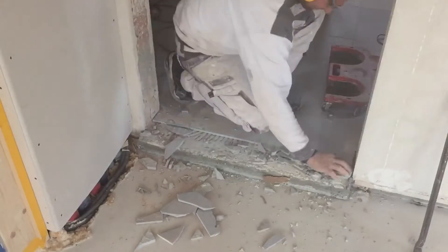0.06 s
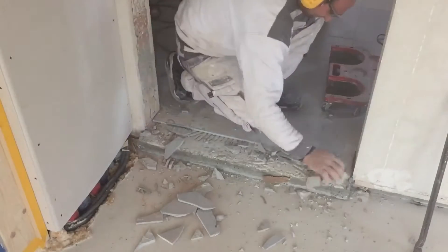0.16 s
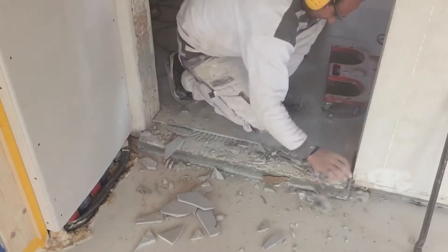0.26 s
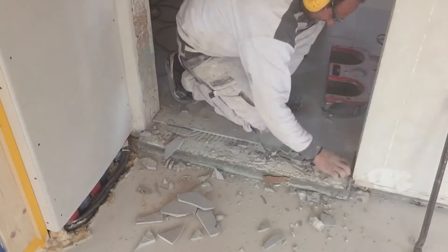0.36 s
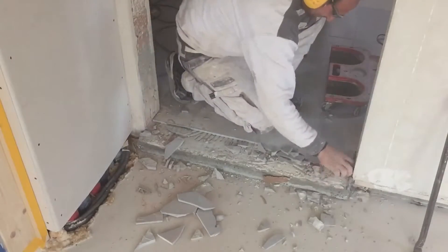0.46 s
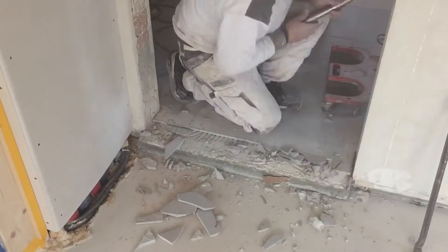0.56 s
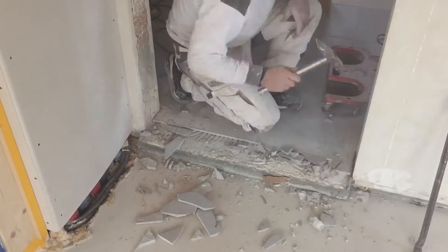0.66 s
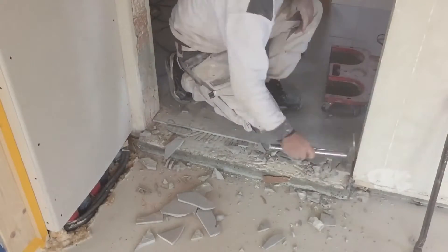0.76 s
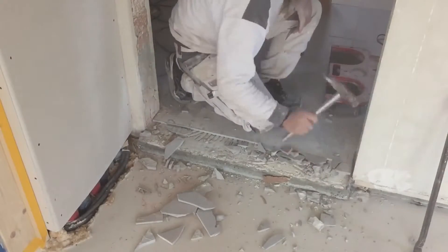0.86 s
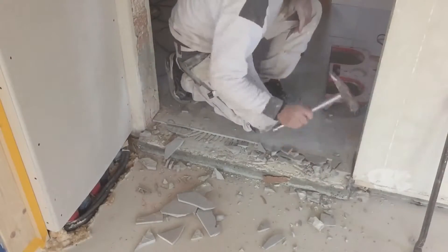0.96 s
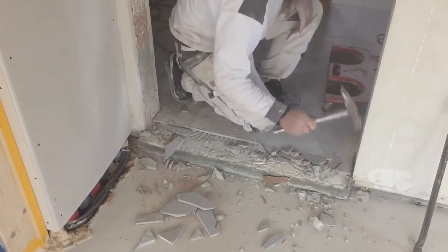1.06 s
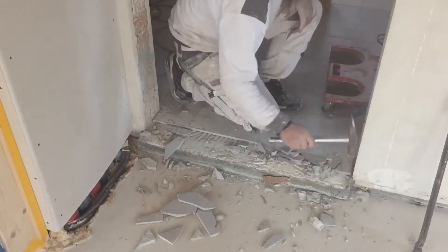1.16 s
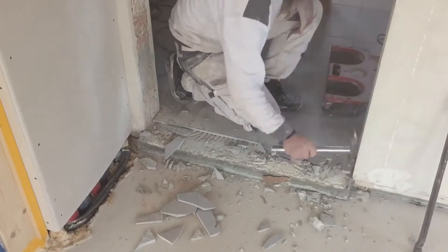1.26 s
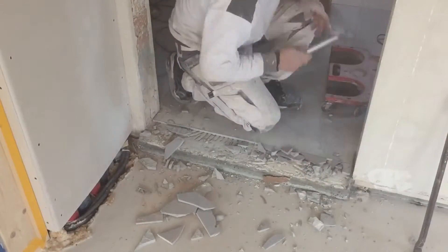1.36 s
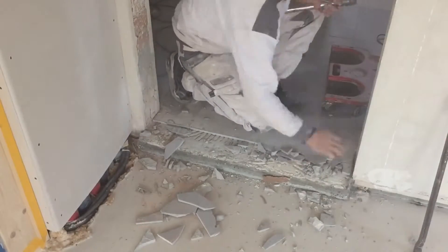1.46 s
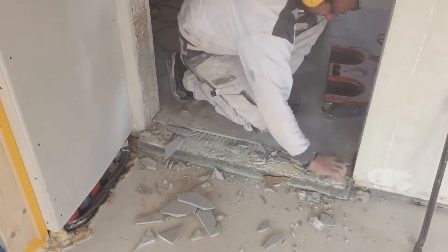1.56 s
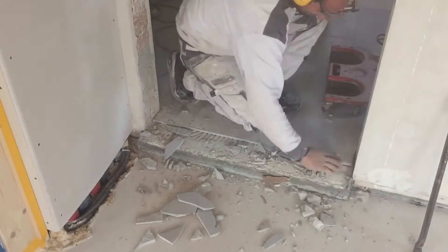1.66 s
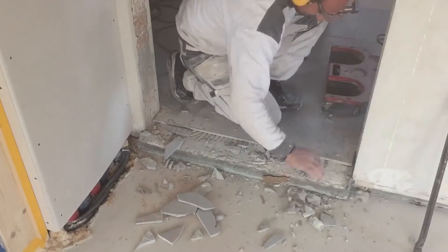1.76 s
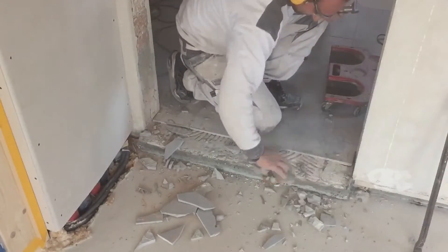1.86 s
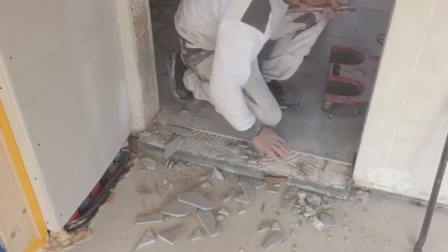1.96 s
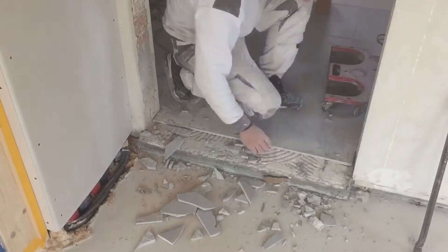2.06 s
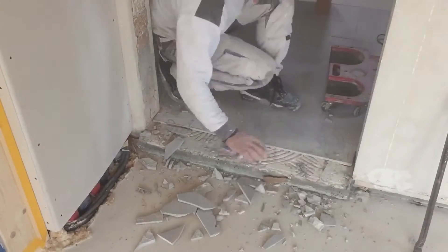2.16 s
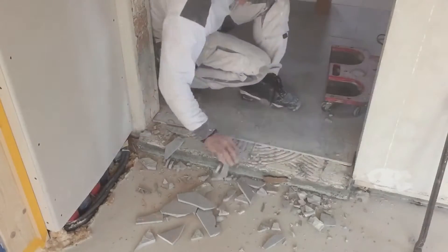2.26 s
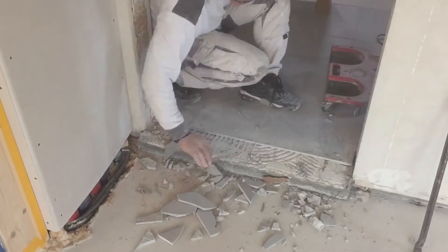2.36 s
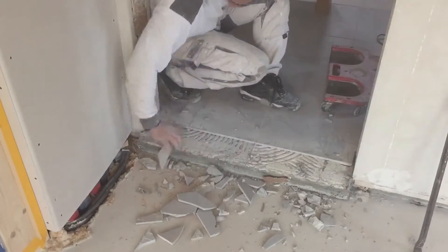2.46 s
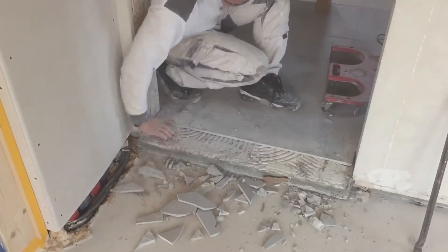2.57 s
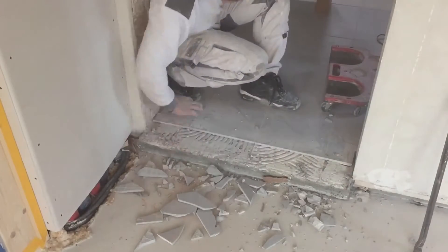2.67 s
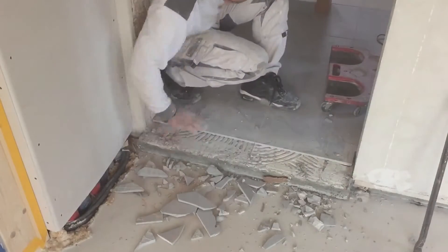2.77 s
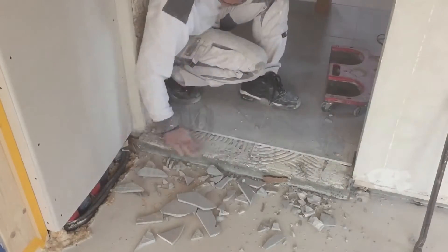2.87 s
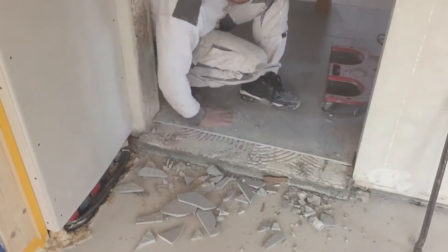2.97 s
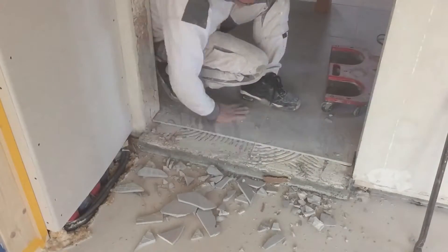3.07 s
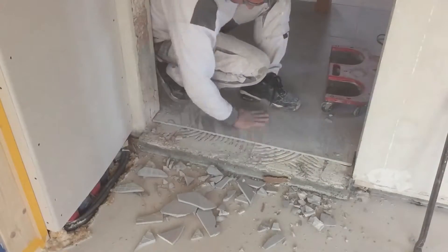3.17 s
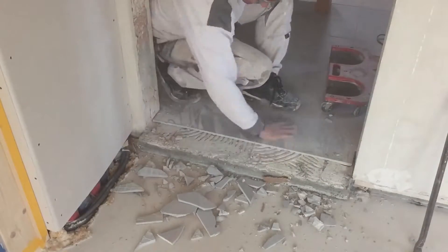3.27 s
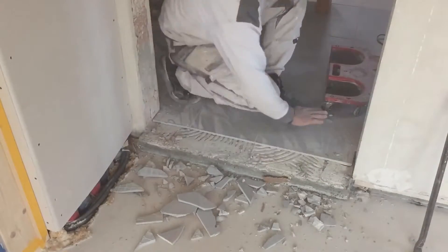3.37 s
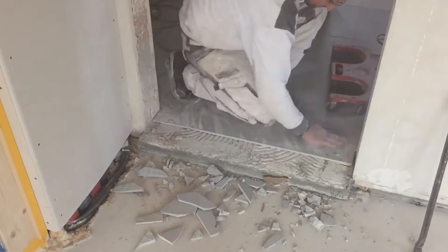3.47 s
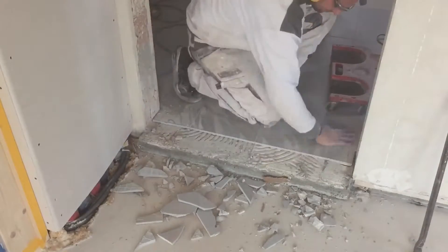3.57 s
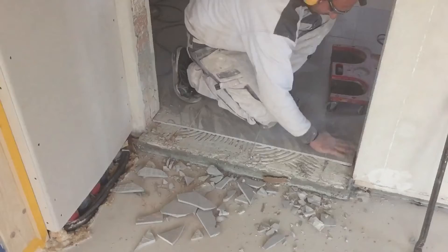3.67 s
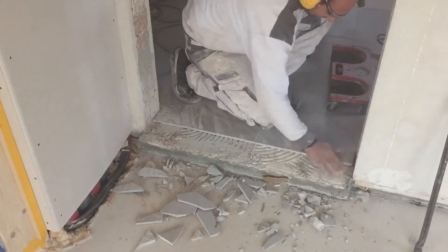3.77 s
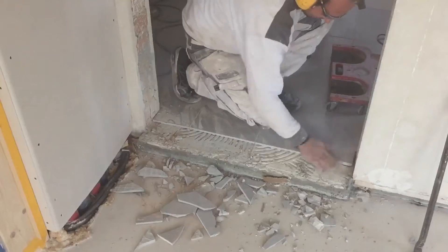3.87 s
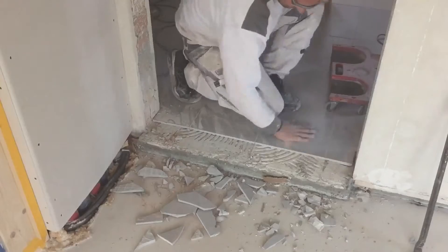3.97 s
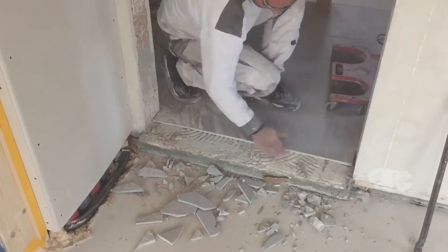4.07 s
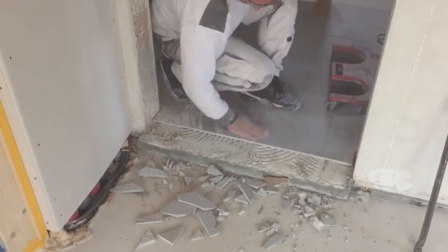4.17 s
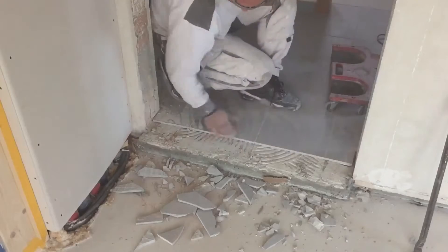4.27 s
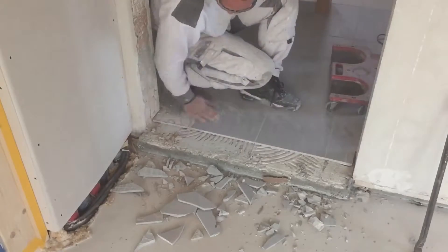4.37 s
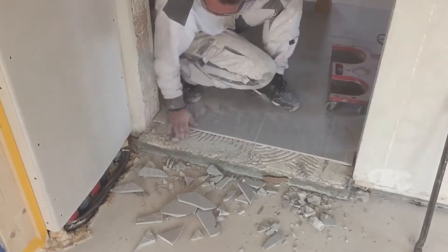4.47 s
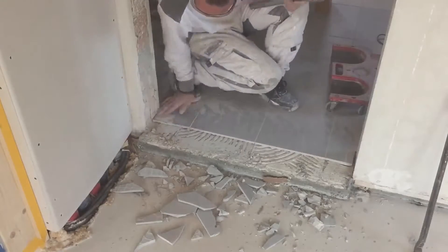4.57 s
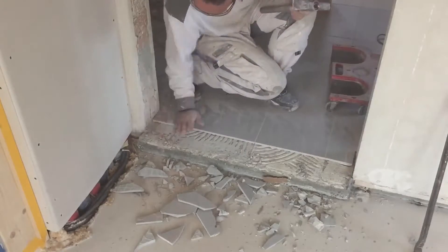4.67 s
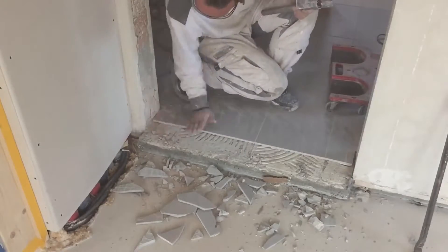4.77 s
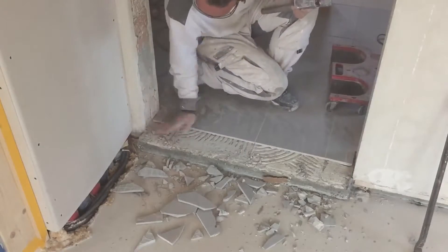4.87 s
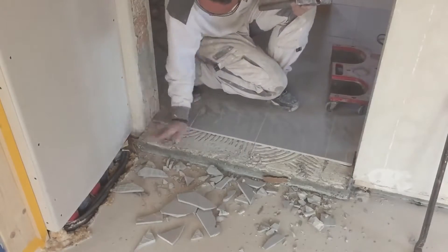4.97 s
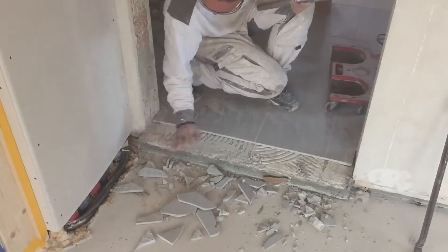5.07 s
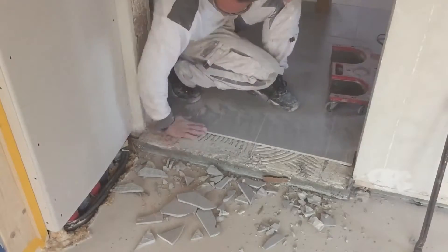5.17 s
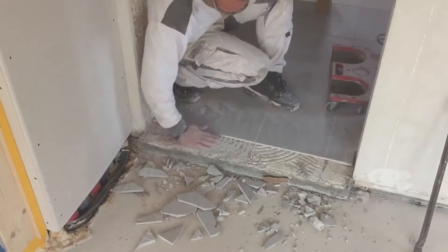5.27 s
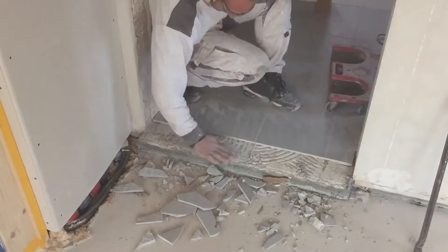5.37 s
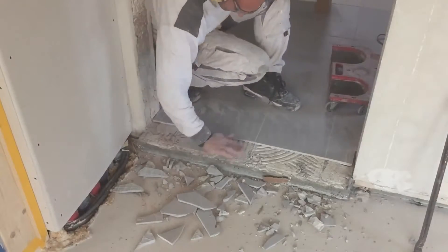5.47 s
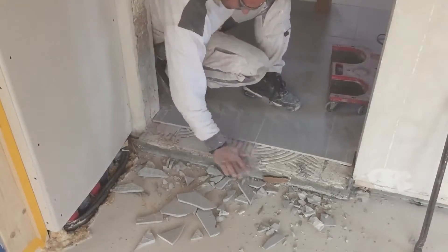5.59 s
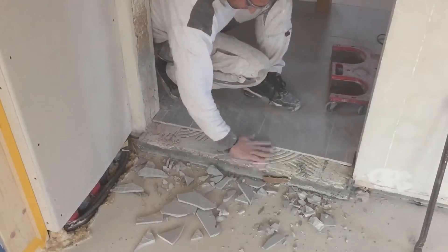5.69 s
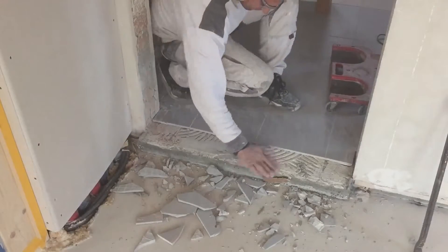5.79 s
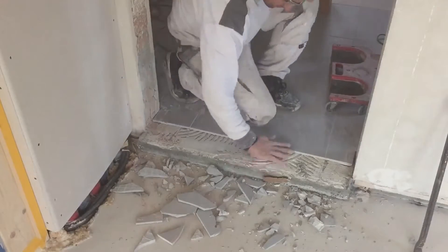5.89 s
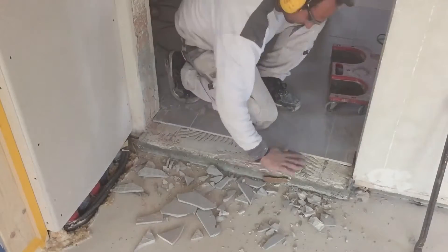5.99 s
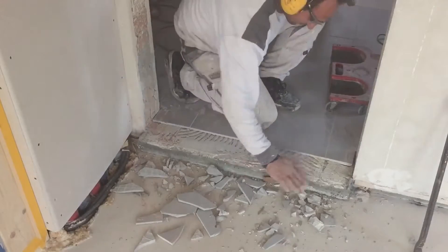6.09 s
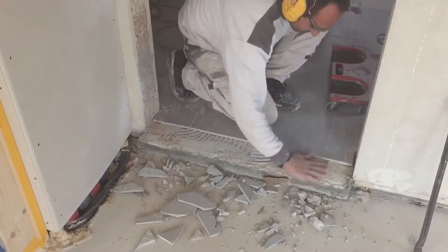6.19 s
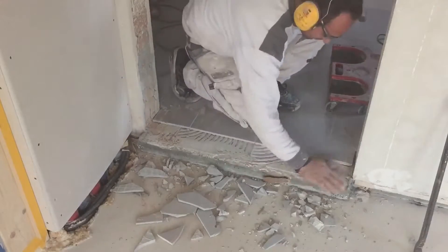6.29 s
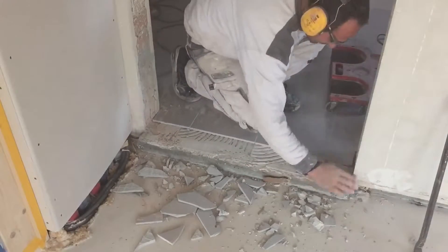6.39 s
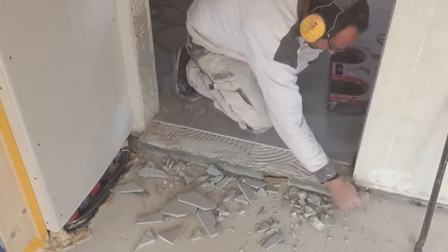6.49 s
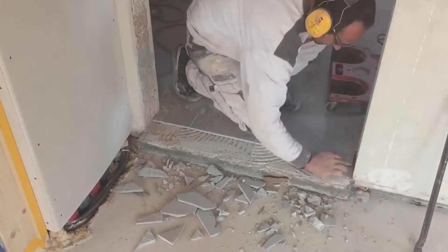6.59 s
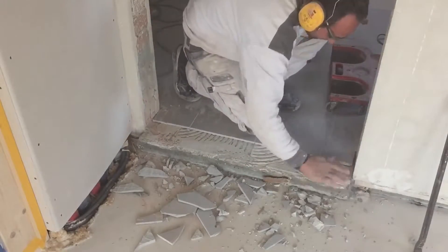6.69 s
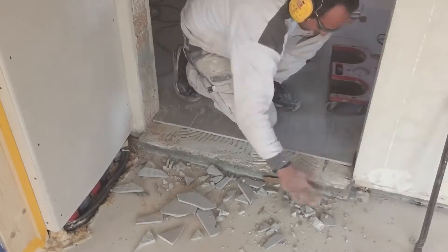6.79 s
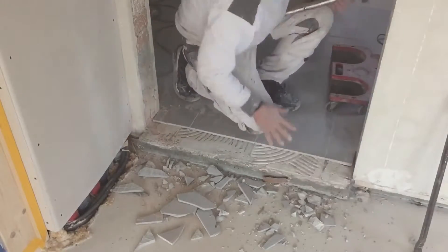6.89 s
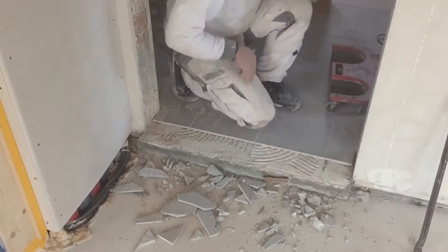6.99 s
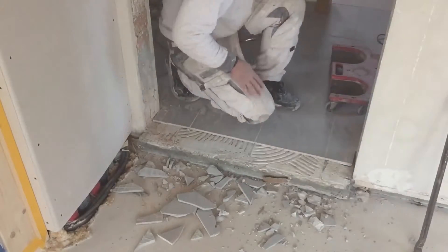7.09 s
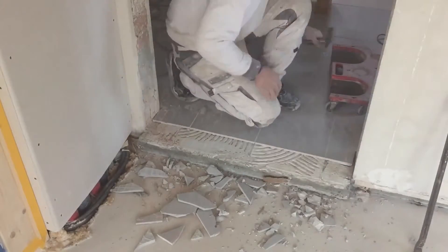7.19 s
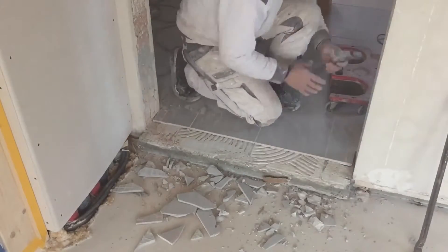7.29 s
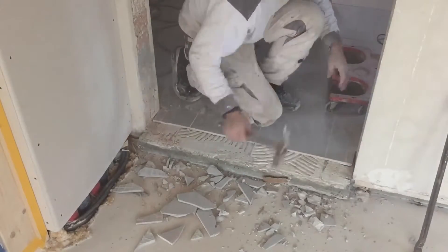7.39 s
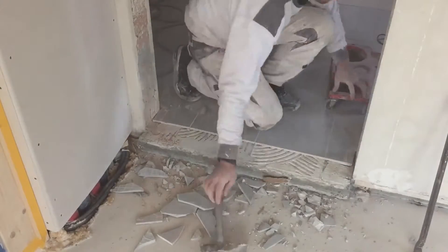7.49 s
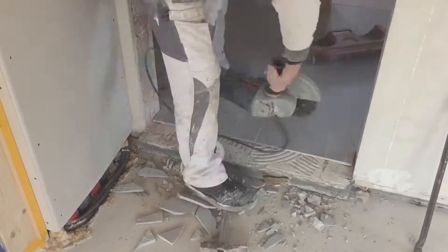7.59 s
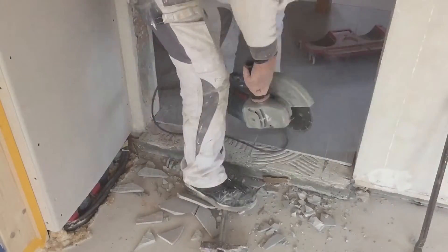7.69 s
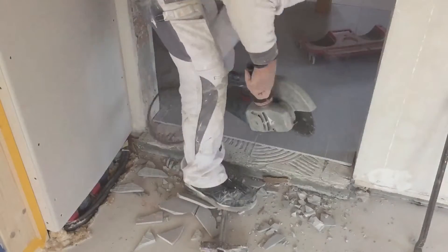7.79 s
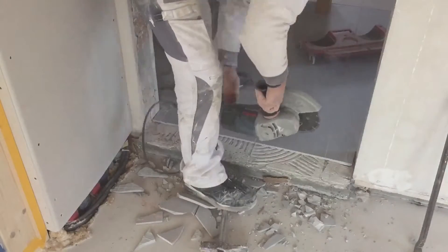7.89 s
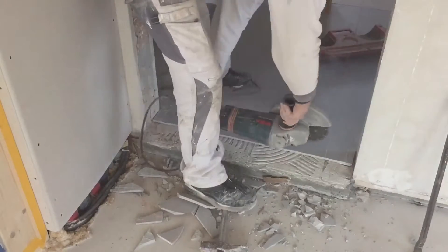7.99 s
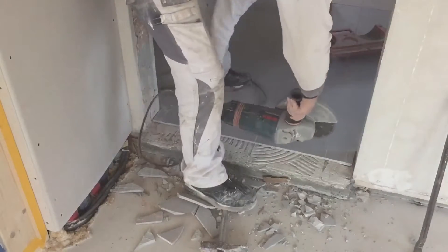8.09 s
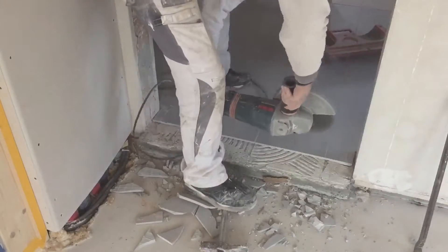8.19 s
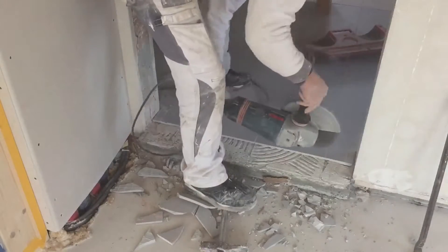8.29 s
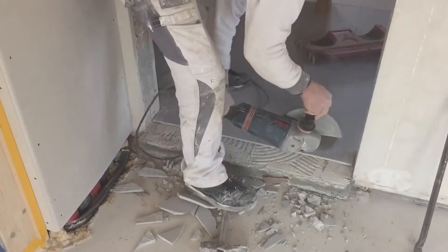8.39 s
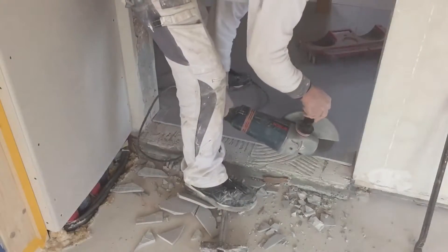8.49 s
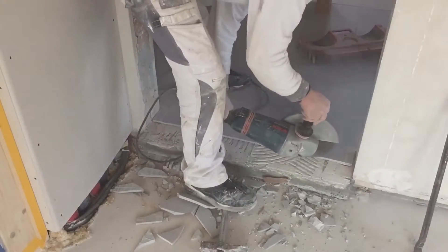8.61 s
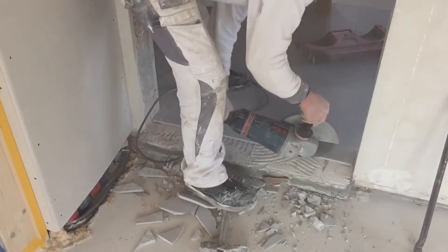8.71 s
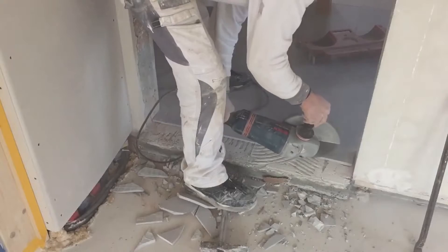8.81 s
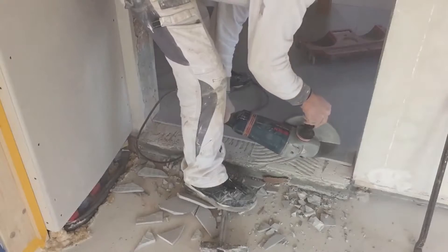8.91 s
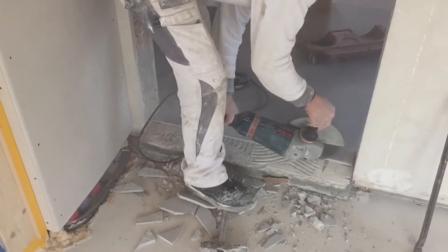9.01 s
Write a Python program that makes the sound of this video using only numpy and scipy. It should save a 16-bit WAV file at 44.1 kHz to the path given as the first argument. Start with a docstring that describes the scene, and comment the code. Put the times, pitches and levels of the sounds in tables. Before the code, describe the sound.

Dry scraping of tile shards and grit, quick hammer knocks, a ringing chisel drop, and finally a large grinder starting and biting screed.

```python
"""In a bare room a hand sweeps rubble and grit off a combed tile bed: noise grains swell and die in strokes.
A hammer lands five blows, each a crack and a short ring. Sweeping goes on, with palm slides over the ridges.
A steel chisel clatters down, in clanks and beating modes. Last, a large angle grinder starts: its disc
rattles and rings as resonated grains, the motor whines up, and the disc screeches on the screed.
Throughout, a far machine drones through the building as coloured noise with wavering, humming bands."""
import sys
import numpy as np
from scipy import signal
from scipy.fft import rfft, irfft, next_fast_len
from scipy.io import wavfile
from scipy.ndimage import uniform_filter1d

SR = 44100
rng = np.random.default_rng(int(sys.argv[2]) if len(sys.argv) > 2 else 0)


def transcribe(signal):
    """Save signal, clipped to [-1, 1], as a 16-bit WAV file at the path in sys.argv[1]."""
    frames = np.atleast_2d(signal).T
    limited = np.clip(frames, -1, 1)
    pcm = np.round(limited * 32767).astype(np.int16)
    wavfile.write(sys.argv[1], SR, pcm)


N = 399105  # samples


def gain_of(db):
    """Turns decibels into an amplitude factor."""
    return 10 ** (np.asarray(db) / 20)


def evened(x):
    """Scales to rms 1."""
    return x / np.sqrt(np.mean(x ** 2) + 1e-20)


def read(points, hz):
    """Reads a curve on a log-frequency axis."""
    f, value = np.transpose(points)
    return np.interp(np.log(hz + 1), np.log(f + 1), value)


def level_at(points, t):
    """Reads a curve of (seconds, value) at the times t."""
    return np.interp(t, *np.transpose(points))


def add(mix, s, sound):
    """Mixes a sound in at s seconds."""
    part = mix[round(s * SR):][:len(sound)]
    part += sound[:len(part)]


def filtered(x, points, size):
    """Applies a curve of dB over Hz by FFT."""
    hz = np.fft.rfftfreq(size, 1 / SR)
    return irfft(rfft(x, size) * gain_of(read(points, hz)), size)


def coloured(x, points):
    """Filters by a spectrum and scales to rms 1."""
    return evened(filtered(x, points, next_fast_len(len(x)))[:len(x)])


def resonate(x, hz, width):
    """One resonance: shifts hz down to zero, smooths, shifts back; rms 1."""
    turn = np.exp(2j * np.pi * np.cumsum(hz * np.ones(len(x))) / SR)
    r = np.exp(-np.pi * abs(width) / SR)
    return evened((turn * signal.lfilter([1], [1, -r], x / turn)).real)


def resonate_twice(x, hz, width):
    """Two equal resonances in a row, for steeper skirts."""
    return resonate(resonate(x, hz, width), hz, width)


def wander(count, smooth):
    """Slow random motion: noise averaged twice over smooth samples; rms 1."""
    noise = rng.standard_normal(count)
    return evened(uniform_filter1d(uniform_filter1d(noise, smooth), smooth))


def grains(count, per_s, spread_db):
    """Sparse clicks of random sign, a few large."""
    sizes = gain_of(spread_db * np.minimum(rng.exponential(1, count), 5))
    return evened(rng.standard_normal(count) * sizes * (rng.random(count) < per_s / SR))


def ringing(modes, t, uneven_db, upper_db=0.):
    """Dying sines, struck unevenly; upper_db lifts the modes above 8 kHz."""
    out = np.zeros(len(t))
    for (hz, db, t60), struck in zip(modes, rng.standard_normal(len(modes))):
        start_db = db + uneven_db * struck + upper_db * (hz > 8000)
        out += gain_of(start_db - 60 * t / t60) * np.sin(2 * np.pi * hz * t)
    return out


def click(points):
    """The sharpest causal (minimum-phase) pulse with a given spectrum, energy 1."""
    log_gain = np.log(gain_of(read(points, abs(np.fft.fftfreq(4096, 1 / SR)))))
    pulse = np.fft.ifft(np.exp(np.conj(signal.hilbert(log_gain)))).real[:2048]
    return pulse / np.linalg.norm(pulse)


def splinters(points, t, decay_s, share):
    """One sharp pulse followed by a short spray of smaller ones."""
    spray = share * rng.standard_normal(len(t)) * np.exp(-t / decay_s) + (t == 0)
    return signal.fftconvolve(spray, click(points))[:len(t)]


# The palm slides over the combed ridges, one short brush per ridge. Each row: first brush in seconds,
# last brush in seconds, ridges per second, first grit level in dB, last grit level in dB, rubble level in dB,
# brush length in seconds, loudest band in Hz.
PALM_SLIDES = [(3.067, 3.4606, 10., -45.5, -50.5, -66.5, 0.029, 6900),
               (3.763, 4.468, 15.6, -61, -51, -82.5, 0.012, 6800),
               (5.4525, 5.861, 14.6, -60.5, -63, -65, 0.025, 12380),
               (6.019, 6.417, 15.4, -59.5, -67.5, -72.5, 0.029, 11000)]
RIDGE_SCATTER_DB, RIDGE_SCATTER_S = 3, 0.0035
RIDGE_SCATTER_PITCH = 0.057  # spread of the natural log of the band's pitch


def ridges():
    """Turns each slide into evenly spaced, slightly uneven brushes."""
    rows = []
    for first, last, per_s, first_db, last_db, rubble_db, length, hz in PALM_SLIDES:
        along = np.linspace(0, 1, round((last - first) * per_s) + 1)
        scatter = rng.standard_normal((len(along), 4))
        for a, (late, loud, coarse, high) in zip(along, scatter):
            start = first + a * (last - first) + RIDGE_SCATTER_S * late
            grit_db = first_db + a * (last_db - first_db) + RIDGE_SCATTER_DB * loud
            coarse_db = rubble_db + RIDGE_SCATTER_DB * coarse
            rows.append((start, grit_db, coarse_db, length, hz * np.exp(RIDGE_SCATTER_PITCH * high)))
    return rows


# Hand strokes through the rubble. Each row: moment plainly heard in seconds, grit level in dB,
# rubble level in dB, length in seconds, loudest band in Hz.
HAND_STROKES = [(0.031, -45.5, -43, 0.02, 4700), (0.121, -51, -48, 0.065, 2950),
                (0.196, -51, -47.5, 0.07, 2800), (0.295, -42, -51, 0.08, 2800),
                (0.362, -38.5, -44.5, 0.027, 7600), (1.599, -45.5, -46.5, 0.074, 2290),
                (1.695, -45, -55, 0.024, 12200), (1.7575, -44.5, -46, 0.087, 12200),
                (1.918, -42.5, -46, 0.069, 4550), (1.932, -43.5, -50.5, 0.16, 2820),
                (1.976, -42, -41.5, 0.034, 3680), (2.15, -46, -42, 0.085, 11800),
                (2.208, -43.5, -65, 0.018, 10400), (2.306, -45.5, -44, 0.036, 4000),
                (2.358, -40, -45, 0.048, 15400), (2.453, -48.5, -47.5, 0.026, 4270),
                (2.525, -39.5, -38.5, 0.049, 10900), (2.582, -39, -34.5, 0.062, 14800),
                (2.602, -29.5, -43, 0.021, 4300), (2.691, -44.5, -37.5, 0.041, 2680),
                (2.812, -52, -81, 0.013, 10600), (2.9275, -45.5, -48, 0.044, 7400),
                (2.984, -41.5, -60, 0.016, 15100), (3.516, -48.5, -52, 0.046, 3420),
                (3.554, -49, -57.5, 0.064, 10600), (3.658, -52.5, -78, 0.038, 15200),
                (4.062, -56.5, -57.5, 0.081, 5860), (4.546, -43, -45, 0.042, 4470),
                (4.604, -53.5, -51, 0.03, 4350), (4.721, -46.5, -52, 0.039, 15400),
                (4.837, -47, -73, 0.0089, 10350), (4.92, -50.5, -73.5, 0.014, 10000),
                (5.021, -55.5, -53.5, 0.023, 2800), (5.079, -58, -73.5, 0.014, 14500),
                (5.121, -51.5, -54.5, 0.016, 3150), (5.158, -57, -65, 0.032, 15300),
                (5.277, -59.5, -63.5, 0.03, 13700), (5.353, -51, -50, 0.035, 3770),
                (5.8, -62, -77, 0.022, 15300), (6.545, -55, -60, 0.02, 4940),
                (6.639, -51, -53, 0.043, 12730), (6.722, -49.5, -51.5, 0.03, 6300),
                (6.806, -54, -62, 0.016, 4900), (6.869, -58.5, -64.5, 0.02, 3750),
                (6.932, -57.5, -59.5, 0.01, 11900), (7.028, -62, -61.5, 0.053, 3990),
                (7.081, -52.5, -62, 0.019, 3700), (7.884, -65, -50, 0.033, 2800),
                (7.935, -52.5, -48.5, 0.028, 2340), (7.993, -55.5, -60, 0.012, 10400)]
# Colour of the fine grit. Each row: frequency in Hz, relative density in dB per Hz.
GRIT_COLOUR = [(2500, -28.5), (5000, -5.5), (7000, 1), (9000, 1), (12000, 0.5), (15500, -1.5)]
# Colour of the coarser rubble. Each row: frequency in Hz, relative density in dB per Hz.
RUBBLE_COLOUR = [(300, -31), (700, -6), (1100, -0.5), (2000, -0.5), (3500, -0.5), (5500, -3.5), (9000, -22)]
BAND_DB = -3.5  # the loudest band against the grit
ROLL_DB, ROLL_S = -19, 0.052  # loose material rolls on after each stroke
STROKE_RISE = .36  # time constant of the rise, as a share of the length
STROKE_LEAD = .2  # a stroke creeps in this share of its length before it is plainly heard


def sweeping():
    """Each stroke swells, drags and dies; fine grit hisses and coarser rubble scrapes."""
    u = np.arange(SR // 4) / SR
    grit_level, rubble_level, tinted = np.zeros(N), np.zeros(N), np.zeros(N)
    for s, grit_db, rubble_db, length, hz in HAND_STROKES + ridges():
        s -= STROKE_LEAD * length
        rise = (1 - np.exp(-u / (STROKE_RISE * length))) ** 1.2
        shape = rise * np.exp(-(u / (1.227 * length)) ** 2.6)
        rolling = rise * gain_of(ROLL_DB) * np.exp(-(u / (ROLL_S + length)) ** 2)
        add(grit_level, s, gain_of(grit_db) * (shape + rolling))
        add(rubble_level, s, gain_of(rubble_db) * (shape + rolling))
        # chips of one size sing in one broad band
        band = resonate_twice(grains(len(u), 1200, 3.0), hz, 0.16 * hz)
        add(tinted, s, gain_of(grit_db + BAND_DB) * shape * band)
    # grains come in clumps a few ms long
    lumps = evened(gain_of(0.59 * wander(N, 300)))
    grit = grit_level * lumps * coloured(grains(N, 3100, 2.3), GRIT_COLOUR)
    rubble = rubble_level * lumps * coloured(grains(N, 2500, 1.86), RUBBLE_COLOUR)
    return grit + rubble + tinted


# Single chips click against tile. Each row: start in seconds, level in dB, pitch in Hz.
CHIP_TICKS = [(0.0365, -45, 4900), (0.3594, -27, 7530), (0.3667, -27, 7530), (1.6017, -52, 2450),
              (1.6952, -31, 12200), (1.9669, -30, 6240), (1.987, -29, 3770), (2.169, -30, 11800),
              (2.2122, -28, 10400), (2.242, -30, 15100), (2.359, -25, 15900), (2.5356, -23, 10600),
              (2.5722, -15, 14800), (2.611, -29, 4220), (2.9264, -42, 7400), (2.9851, -25, 15430),
              (3.6195, -42, 14360), (4.0704, -48.5, 5670), (4.6179, -30, 6070), (5.086, -38.5, 14700),
              (6.0684, -54, 3800), (6.6495, -36, 12600), (7.889, -60, 4950), (7.937, -59, 4030)]


def chips():
    """Tiny ticks: a few ms of bright noise with a broad ring."""
    out, t = np.zeros(N), np.arange(SR // 20) / SR
    for s, db, hz in CHIP_TICKS:
        noise = rng.standard_normal(len(t))
        edge = 0.17 * np.diff(noise, 2, prepend=[0, 0])  # double difference: mostly treble
        tick = edge + resonate_twice(noise, hz, .35 * hz)
        add(out, s, gain_of(db) * tick * np.exp(-t / 0.0011))
    return out


# Heavier shards knock on the floor. Each row: start in seconds, level in dB, pitch in Hz, t60 in seconds.
SHARD_KNOCKS = [(2.572, -28.5, 900, 0.23), (2.6, -33.5, 1060, 0.52), (2.7, -38, 800, 0.2),
                (3.514, -47.5, 379, 0.14), (3.517, -38.5, 3500, 0.12), (3.825, -51, 1300, 0.14),
                (3.89, -53.5, 1400, .1), (3.943, -43, 1310, 0.088), (4.126, -41, 1296, 0.14),
                (4.605, -39.5, 1100, 0.23), (5.373, -44.5, 1500, 0.095), (5.994, -44, 280, .15),
                (6.004, -43, 438, 0.11)]


def knocks():
    """Dull bursts of noise in one broad resonance."""
    out, t = np.zeros(N), np.arange(SR // 4) / SR
    for s, db, hz, t60 in SHARD_KNOCKS:
        body = resonate_twice(rng.standard_normal(len(t)), hz, .5 * hz)
        add(out, s, gain_of(db - 60 * t / t60) * (1 - np.exp(-t / 0.0039)) * body)
    return out


# A light touch, then five blows. Each row: start in seconds, relative level in dB, crack brightness in dB.
HAMMER_BLOWS = [(0.838, -28, -3), (0.8503, -1, 1), (0.9748, 0, 1.5), (1.0933, 0.5, 0.), (1.215, 1, -2.5),
                (1.338, -1.5, -2.5)]
# Modes of hammer head and tile bed. Each row: frequency in Hz, relative level in dB, t60 in seconds.
SLAB_MODES = [(743, -11, 0.065), (983, 1.5, 0.022), (1230, -2, 0.024), (1490, -5.5, 0.025),
              (1536, -2.5, .03), (2980, -2, .01), (3860, -6.5, 0.012), (4115, -5, 0.01), (11000, -16, .02)]
# Colour of the crack. Each row: frequency in Hz, relative density in dB per Hz.
CRACK_COLOUR = [(18, -61.5), (30, -45.5), (100, -48), (217, -37), (400, -11.5), (490, -18), (728, -6),
                (1050, -8), (1480, -2.5), (1780, -5), (2580, -11), (3940, -8.5), (7030, -15.5),
                (14700, -24), (16300, -25.5)]


def hammer():
    """A sharp crack and the brief ring of head and slab."""
    out, t = np.zeros(N), np.arange(SR // 3) / SR
    for s, db, bright_db in HAMMER_BLOWS:
        crack = gain_of(bright_db + 20.5) * splinters(CRACK_COLOUR, t, .002, .045)
        ring = gain_of(-9.0) * ringing(SLAB_MODES, t, 1)
        add(out, s, gain_of(db) * (crack + ring))
    return out


# Bounces of the chisel. Each row: start in seconds, relative level in dB, lift of the upper modes in dB.
CHISEL_BOUNCES = [(7.542, -56.5, -2), (7.55, -54, -8), (7.576, -21, -1.5), (7.584, -27, -16),
                  (7.596, -30.5, -15), (7.614, -24.5, 5.5)]
# Steel bar, some modes in close beating pairs. Each row: frequency in Hz, relative level in dB, t60 in seconds.
BAR_MODES = [(857, 1, 0.34), (2250, -15.5, 0.43), (3500, -18, 0.28), (3900, -3, 0.53), (3895, 4, 0.65),
             (6060, 12.5, 0.3), (6000, -5, .5), (9120, -9, .5), (9000, -10, 0.5), (10380, 4.5, 0.44),
             (10400, -8.5, 0.24), (11510, 5, 0.66), (11800, -11, 0.41), (14950, -10, .3)]
# Colour of the clank. Each row: frequency in Hz, relative density in dB per Hz.
CLANK_COLOUR = [(150, -29.5), (500, -11), (800, 2), (1300, -1), (2300, -3.5), (4000, -1.5), (7500, -12),
                (12000, -9), (16000, -34)]


def chisel():
    """Bounces of a steel bar on the floor: the clanks and the ring of the bar."""
    clanks, ring, t = np.zeros(N), np.zeros(N), np.arange(SR // 5) / SR
    for s, db, upper_db in CHISEL_BOUNCES:
        add(clanks, s, gain_of(db + 20.5) * splinters(CLANK_COLOUR, t, 0.0067, 0.11))
        add(ring, s, gain_of(db - 13.0) * ringing(BAR_MODES, t, 1.0, upper_db))
    # the level of the bar's ring wavers at random
    return clanks, ring * evened(gain_of(3.0 * wander(N, 250)))


# Click of the switch: start in seconds, level in dB.
SWITCH_CLICK = (8.2245, -17)
# Run-up of the grinder, sagging a little in the cut. Each row: time in seconds, gear mesh in Hz.
RUN_UP = [(8.226, 353), (8.299, 590), (8.421, 999), (8.5, 1200), (8.6, 1342), (8.716, 1467), (8.85, 1532),
          (8.931, 1548), (8.99, 1564), (9.05, 1559)]
# Pressure of the disc on the screed. Each row: time in seconds, cutting level in dB.
PRESSURE = [(8.45, -64), (8.74, -40), (8.86, -21.5), (8.93, -26), (8.97, -26.5), (8.995, -13.5),
            (9.05, -12.5)]
# Disc modes. Each row: frequency in Hz, width in Hz, relative level in dB.
DISC_MODES = [(800, 8.1, -27), (1200, 12, -21), (1607, 6.5, -13.5), (2475, 5.6, -14), (2800, 10, -20),
              (3198, 20, -9), (3600, 48, 4), (3674, 60, 3), (3760, 270, -6), (3900, 28, -5),
              (4900, 400, -6), (6420, 45, -7.5), (6600, 69, -6.5), (6500, 230, -24), (9970, 120, -10)]
# Disc against screed. Each row: frequency in Hz, width in Hz, relative level in dB.
CUTTING_MODES = [(804, 21, -13), (3800, 29, -1), (4280, 28, 4.5), (6240, 42, -21), (7400, 28.7, -3),
                 (9500, 45, -2), (9920, 45, -15), (10110, 64, 10), (10600, 440, -3), (10720, 67, 4),
                 (10900, 87, -7), (12200, 80, 1), (13700, 55, 0), (14400, 200, -3.5)]
# The gear tone swells as it passes these. Each row: frequency in Hz, half-width in Hz, peak level in dB.
HOUSING_MODES = [(1450, 20, -23), (1548, 8.9, -28)]
# Other shaft and fan orders. Each row: multiple of the gear mesh, level in dB at full speed, width in Hz.
ORDERS = [(0.147, -51.5, 3.7), (0.192, -46.5, 5.1), (0.252, -44.5, 6), (.75, -32, 79), (2.74, -34.5, 21),
          (4, -29, 20)]
# Commutator whine: multiple of the gear mesh, level in dB once above 8 kHz, width in Hz.
COMMUTATOR = (13.1, -30, 1000)
# Colour of the air and brush roar. Each row: frequency in Hz, relative density in dB per Hz.
ROAR_COLOUR = [(24, -98.5), (40, -68), (65, -62), (366, -24), (483, -37), (621, -6), (1110, -19.5),
               (1320, -10), (1500, -10.5), (1700, -15), (2740, -14), (3700, -8.5), (3990, -8.5),
               (14100, -13), (16300, -17.5)]
JOLT_DB, JOLT_FADE_DB_PER_S = -9.5, 45.5  # the start jolts the disc
IDLE_RATTLE_DB, CUT_RATTLE_DB = -29, -9  # a steady rattle; the cut shakes the disc again, against the cut
ROAR_DB, ROAR_RISE_DB = -18, 17  # roar at full speed, and its rise from rest
GEAR_DB = -44  # gear tone at full speed, before the housing swells it


def grinder():
    """Slack in the gears rattles the disc; gear and fan tones rise with speed; the cut screeches."""
    start = RUN_UP[0][0]
    t = np.arange(start, N / SR, 1 / SR)
    count = len(t)
    mesh_hz, cut_db = level_at(RUN_UP, t), level_at(PRESSURE, t)
    speed = mesh_hz / mesh_hz.max()

    jolt = gain_of(JOLT_DB - JOLT_FADE_DB_PER_S * (t - start))
    rattle = jolt + gain_of(IDLE_RATTLE_DB) + gain_of(cut_db + CUT_RATTLE_DB)
    knocking = grains(count, 3000, 3.3)
    disc = evened(sum(gain_of(db) * resonate(knocking, hz, w) for hz, w, db in DISC_MODES))

    housing = sum(gain_of(db) / (1 + ((mesh_hz - hz) / w) ** 2) for hz, w, db in HOUSING_MODES)
    gear_level = gain_of(GEAR_DB) * speed ** 2.5 + housing
    gear = np.sqrt(2) * np.sin(2 * np.pi * np.cumsum(mesh_hz) / SR)
    gear += 0.28 * resonate(rng.standard_normal(count), mesh_hz, 43.0)  # roughens the tone

    orders = np.zeros(count)
    for multiple, db, w in ORDERS:
        orders += gain_of(db) * resonate(rng.standard_normal(count), multiple * mesh_hz, w)
    orders *= speed ** 3.5

    multiple, whine_db, whine_width = COMMUTATOR
    whine_hz = np.minimum(multiple * mesh_hz, .45 * SR)
    whine = resonate_twice(rng.standard_normal(count), whine_hz, whine_width)
    whine *= gain_of(whine_db) * np.clip(whine_hz / 8000.0, 0, 1) ** 2

    roar = coloured(grains(count, 15000, 0.47), ROAR_COLOUR)
    roar *= gain_of(ROAR_DB - ROAR_RISE_DB * (1 - speed))

    scrape = rng.standard_normal(count)
    cut = evened(sum(gain_of(db) * resonate(scrape, hz, w) for hz, w, db in CUTTING_MODES))

    sound = rattle * disc + gear_level * gear + orders + whine + roar + gain_of(cut_db) * cut
    out = np.zeros(N)
    add(out, start, sound * (1 - np.exp(-(t - start) / 0.0035)))
    switch_s, switch_db = SWITCH_CLICK
    add(out, switch_s, gain_of(switch_db) * rng.standard_normal(400) * np.exp(-np.arange(400) / 60))
    return out


# Colour of the far drone. Each row: frequency in Hz, relative density in dB per Hz.
DRONE_COLOUR = [(60, -51.5), (108, -41.5), (177, -15), (251, -15.5), (520, -14), (612, -7.5), (688, -14.5),
                (850, 1), (1000, -14.5), (1500, -28.5), (1900, -25.5), (7000, -33.5), (13500, -35),
                (16300, -33)]
# Level of the far drone before it wavers. Each row: time in seconds, level in dB.
DRONE_RISE = [(0.0, -62.5), (9.05, -56)]
# Humming bands in the drone. Each row: frequency in Hz, width in Hz, level in dB before they waver.
DRONE_BANDS = [(460, 68, -73.5), (618.6, 10, -65.5), (730, 8.6, -62), (857.5, 66, -60)]
# Low hum that swells and sinks. Each row: time in seconds, level in dB.
LOW_HUM = [(0, -78.5), (1.6, -71), (1.8, -70), (2.1, -60.5), (2.4, -70), (2.55, -76.5), (9.05, -75)]
HUM_HZ = 189


def drone():
    """Coloured noise with a few humming bands that waver, over a low hum."""
    t = np.arange(N) / SR
    waver = wander(N, 900)
    bed = coloured(rng.standard_normal(N), DRONE_COLOUR) * gain_of(level_at(DRONE_RISE, t) + 2.2 * waver)
    hum = gain_of(level_at(LOW_HUM, t)) * resonate(rng.standard_normal(N), HUM_HZ, 4.6)
    bands = sum(gain_of(db) * resonate(rng.standard_normal(N), hz, w) for hz, w, db in DRONE_BANDS)
    return bed + hum + gain_of(3.2 * waver) * bands


# Decay of the bare room. Each row: frequency in Hz, t60 in seconds.
ROOM_DECAY = [(200, 0.053), (530, 0.59), (1390, 0.34), (3680, 0.38), (9700, 0.31)]


def room(x):
    """Sparse taps of random sign, each band dying at its own speed."""
    taps = np.zeros(SR)
    slots = np.arange(60, SR - 12, 12)  # one tap somewhere in every 12 samples
    taps[slots + rng.integers(0, 12, len(slots))] = rng.choice([-1., 1.], len(slots))
    hz, t, z = signal.stft(taps, SR, nperseg=256)
    long_decay = gain_of(-60 * t / read(ROOM_DECAY, hz)[:, None])
    early_decay = 1.3 * gain_of(-60 * t / 0.047)
    tail = signal.istft(z * (long_decay + early_decay), SR)[1]
    return signal.fftconvolve(x, tail[None] / np.linalg.norm(tail), axes=1)[:, :N]


# The clatter is faded out: start in seconds, end in seconds.
CLATTER_FADE_OUT = (7.655, 7.678)


def scene():
    """All sources, each but the drone with its share of the room."""
    hand = sweeping() + knocks() + chips()
    blows, (clanks, ring), motor = hammer(), chisel(), grinder()
    rest_send = gain_of(-4.5) * hand + gain_of(-5.5) * motor
    wet_blows, wet_bar, wet_rest = room(np.array([blows, clanks + 0.17 * ring, rest_send]))
    fade = np.interp(np.arange(N) / SR, CLATTER_FADE_OUT, [1, 0])
    hammering = 0.53 * blows + gain_of(2.0) * wet_blows
    clatter = fade * (0.55 * clanks + ring + gain_of(7.0) * wet_bar)
    return (hammering + clatter + hand + 0.85 * motor + wet_rest + drone())[None]


CHAIN_RESPONSE = [(20, -23.5), (100, -23.5), (170, -3.5), (15650, 0.5), (15800, -23), (17000, -24)]
EDGE_HZ = 16494  # upper band limit


def record(dry):
    heard = filtered(dry, CHAIN_RESPONSE, next_fast_len(N + SR))[:, :N]
    clipped = heard / (1 + abs(heard) ** 4) ** .25
    low_pass = signal.firwin(511, EDGE_HZ, window=("kaiser", 9), fs=SR)
    return signal.oaconvolve(clipped, low_pass[None], "same")


dry = scene()
out = record(dry)
transcribe(out)
```